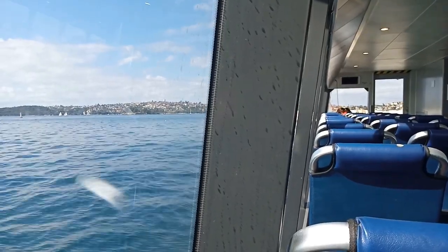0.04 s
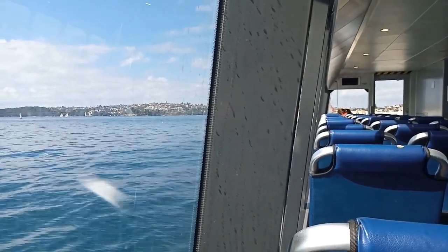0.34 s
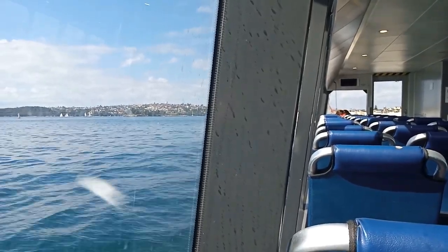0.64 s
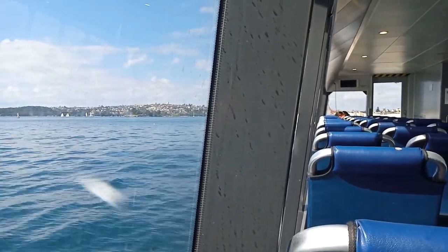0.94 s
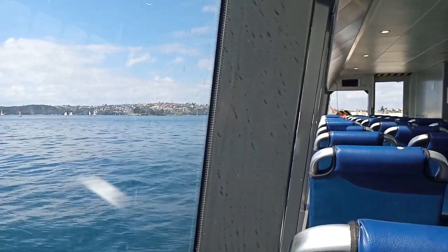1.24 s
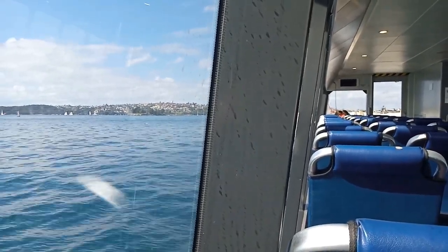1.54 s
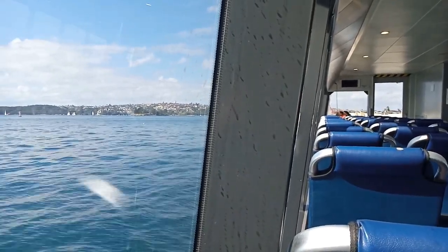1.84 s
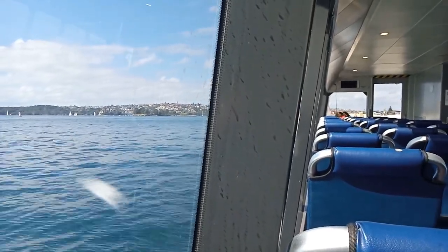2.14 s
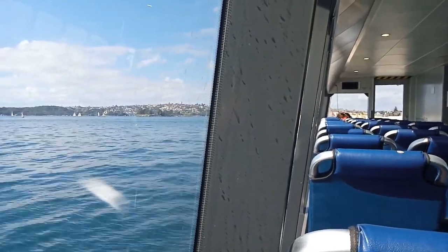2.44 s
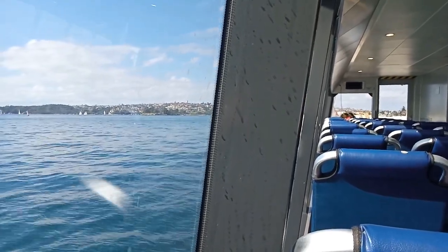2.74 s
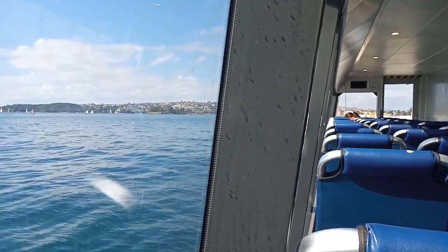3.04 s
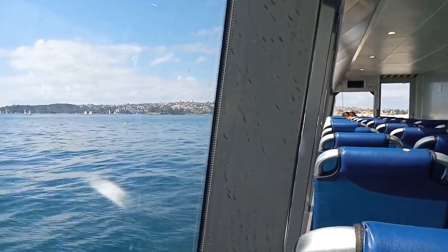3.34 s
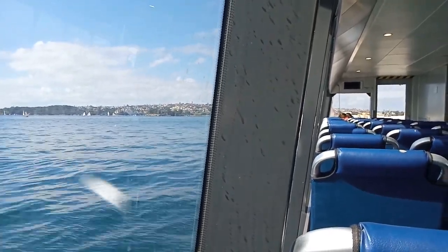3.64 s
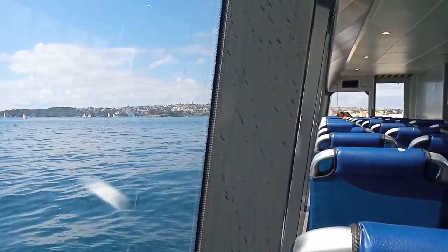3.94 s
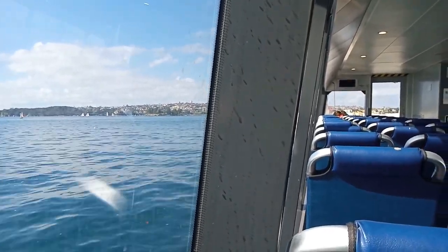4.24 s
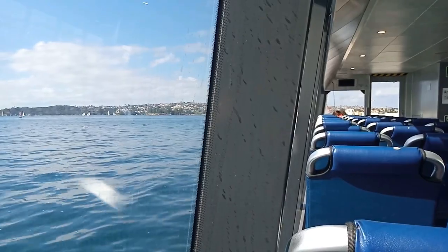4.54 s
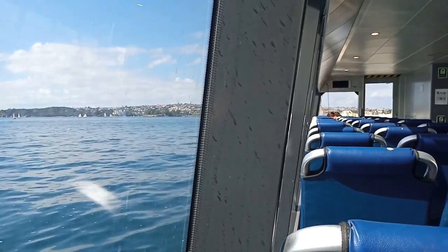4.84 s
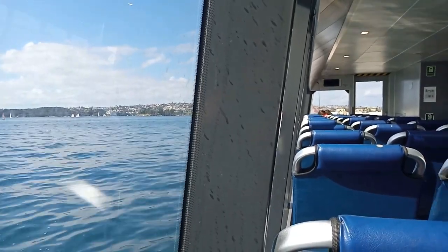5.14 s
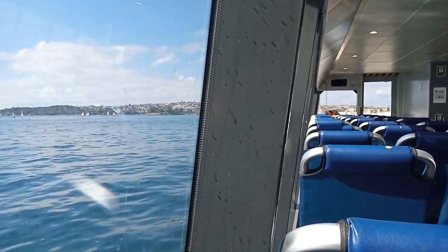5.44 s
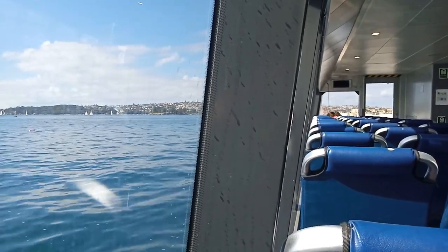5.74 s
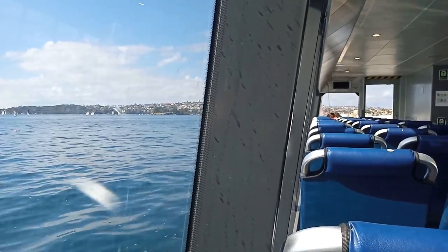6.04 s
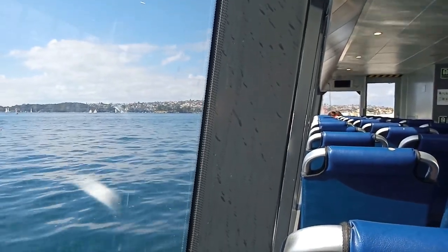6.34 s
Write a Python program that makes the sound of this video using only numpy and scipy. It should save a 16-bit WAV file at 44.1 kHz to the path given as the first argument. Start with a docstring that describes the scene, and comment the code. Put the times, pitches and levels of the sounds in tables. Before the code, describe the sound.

Inside the passenger cabin of a cruising ferry, two diesel engines make a loud, low drone with a deep throb that slowly wavers. The hull shudders and the cabin booms in small uneven surges. Behind this sit a soft rush of water and air, muffled engine clatter, a light gear whine and a very faint high whistle. The sound holds steady throughout, heard from among the seats.

```python
"""Inside the passenger cabin of a ferry at cruising speed.
Two diesel engines turn almost in step: their exhaust throbs and their tones drone and slowly beat.
The gears whine, and the turbochargers (fans that feed air to the engines) whistle faintly.
Water churned by the propellers shakes the hull and makes the cabin boom.
Behind it all are a rush of water and air and the muffled clatter of fuel firing in the cylinders."""
import sys
import numpy as np
from scipy import signal
from scipy.fft import rfft, irfft
from scipy.io import wavfile
from scipy.ndimage import uniform_filter1d

SR = 44100
rng = np.random.default_rng(int(sys.argv[2]) if len(sys.argv) > 2 else 0)


def to_wav(sig):
    """Store sig (one row per channel, or 1-D mono) as 16-bit WAV at the path in sys.argv[1].

    Samples outside -1..1 are clipped; the rate is SR.
    """
    pcm = np.clip(np.atleast_2d(sig), -1, 1) * 32767
    pcm = np.round(pcm).astype(np.int16)
    wavfile.write(sys.argv[1], SR, pcm.T)  # frames by channels


N = 282240
TIME = np.arange(N) / SR  # the second at which each sample falls
BINS = np.fft.rfftfreq(N, 1 / SR)  # the pitch in Hz of each slot in a spectrum


def gain_of(db):
    """Turns decibels (dB) into a number to multiply a sound by."""
    return 10 ** (np.asarray(db) / 20)


def curve(rows, column=1):
    """Joins a table's points with straight lines through time, giving one value a sample."""
    columns = np.transpose(rows)
    return np.interp(TIME, columns[0], columns[column])


def spectrum(points):
    """Joins points of pitch (Hz) and level (dB) into a gain for every pitch."""
    hz, db = np.transpose(points)
    return gain_of(np.interp(np.log(BINS + 1), np.log(hz + 1), db))


def noise(density):
    """Random noise with the given strength at each pitch."""
    return irfft(rfft(rng.standard_normal(N)) * density * np.sqrt(SR / 2), N)


def drift(rate, size=512):
    """A smooth random wobble of typical size 1 that changes about rate times a second."""
    hz = np.fft.rfftfreq(size, N / SR / size)
    slow = irfft(rfft(rng.standard_normal(size)) * np.exp(-.5 * (hz / rate) ** 2), size)
    slow /= np.sqrt(np.mean(slow ** 2))
    return np.interp(TIME, np.linspace(0, N / SR, size), slow)


def tone(turns):
    """A pure tone of average power 1; turns is the running count of its vibrations."""
    return np.sqrt(2) * np.sin(2 * np.pi * (turns + rng.random()))


def steadied(sound, share, size=7000):
    """Evens out a share of a noise's slow random swells and keeps its fast flutter."""
    power = uniform_filter1d(uniform_filter1d(sound ** 2, size), size // 2)
    return sound * (np.mean(sound ** 2) / (power + 1e-20)) ** (share / 2)


def rush(swell_db=.49):
    """Water along the hull and air from the vents make a steady noise that swells slightly."""
    # The body of the rush, then its faint top. Each row: pitch in Hz, noise level in dB per Hz.
    body = [(15, -71.5), (33, -65), (45, -62), (200, -55.5), (305, -56.5), (360, -56.5), (480, -60.5),
            (660, -61.5), (700, -66.5), (790, -67.5), (950, -70.5), (1140, -69.5), (1220, -72.5),
            (1540, -74)]
    hiss = [(1750, -77.5), (3300, -87), (4500, -99), (5400, -114), (6400, -110), (8300, -117), (9600, -125),
            (15500, -129)]
    return noise(spectrum(body + hiss)) * gain_of(swell_db * drift(2.7))


def wall_panels(ripple_db=1.0, spacing_hz=28):
    """A gain for every pitch: the wall panels favour many pitches a little and ring at a few."""
    # The panels that ring most. Each row: pitch in Hz, half width in Hz, boost in dB.
    panels = [(580, 20, 3), (1130, 8.1, 3), (1270, 25, 2), (2440, 50, 1), (3260, 90, 4.5), (3850, 45, 5)]
    grid = np.arange(0, SR / 2, spacing_hz)
    ripple = ripple_db * np.interp(BINS, grid, rng.standard_normal(len(grid)))
    peaks = sum(db / (1 + ((BINS - hz) / width) ** 2) for hz, width, db in panels)
    return gain_of(ripple + peaks)


def clatter(cycles, depth=.08, swell_db=1.16):
    """Firing noise comes through the walls, pulsing with the cycle, crank and unequal cylinders."""
    # The muffled noise before the panels colour it. Each row: pitch in Hz, level in dB per Hz.
    muffled = [(200, -76.5), (500, -68.5), (800, -66), (1200, -74.5), (1500, -72.5), (1750, -79),
               (2150, -84), (2600, -81.5), (3200, -86.5), (3900, -91.5), (4500, -100), (5300, -114),
               (7000, -130)]
    pulsing = sum(tone(order * cycles) for order in (1, 2, 3, 10, 11))
    through_walls = noise(spectrum(muffled) * wall_panels())
    return through_walls * (1 + depth * pulsing) * gain_of(swell_db * drift(2.2))


def turbochargers(flutter_hz=10, rasp=.38):
    """The spinning blades of each turbocharger give a thin whistle that flutters in pitch and level."""
    # The near and the far whistle. Each row: time in seconds, pitch in Hz, level in dB before the boost.
    near = [(0, 10153, -85.5), (.45, 10163, -83), (1, 10166, -85.5), (1.27, 10170, -83),
            (1.5, 10158, -85.5), (2.1, 10168, -82), (2.35, 10162, -76.5), (2.65, 10150, -76),
            (3, 10144, -81), (3.6, 10145, -83.5), (4.9, 10124, -87.5), (5.25, 10112, -82.5),
            (5.7, 10097, -80), (6.4, 10092, -78.5)]
    far = [(0, 11105, -97), (.7, 11085, -99), (1.5, 11040, -100), (2.2, 11065, -102), (2.75, 11080, -94),
           (3.1, 11055, -102), (4.1, 11070, -101), (4.3, 11100, -94), (4.5, 11120, -94), (4.7, 11150, -101),
           (5.05, 11185, -93), (5.4, 11150, -99), (5.75, 11115, -96), (6.4, 11090, -102)]
    whistles = np.zeros(N)
    for rows, boost_db, waver_db in [(near, 2.5, 1.4), (far, 1.0, 2.5)]:
        hz = curve(rows) + flutter_hz * drift(25)
        whistle = tone(np.cumsum(hz) / SR)
        level = gain_of(curve(rows, column=2) + boost_db + waver_db * drift(13))
        roughness = 1 + rasp * drift(70, size=4096)
        whistles += level * roughness * whistle
    return whistles


def cabin_boom():
    """Churned water rings the cabin and hull; all but the lowest note surge with the propeller wash."""
    # The notes they ring at. Each row: pitch in Hz, width in Hz, level in dB per Hz before the surges.
    notes = [(32.8, 3.6, -54.5), (76.2, 11, -40.5), (74.2, 12, -39), (88.6, 7.4, -51.5), (108.5, 9.1, -47),
             (136.8, 9.9, -37), (147.7, 7.8, -37.5), (165, 8.7, -45), (181.5, 24, -41), (190, 32, -46.5),
             (223, 18, -40.5), (244.8, 12, -41.5), (272.8, 22, -45)]
    # The four pitches in Hz that split those notes into five groups.
    edges_hz = [60, 120, 160, 205]
    # The surges of the top four groups, low to high. Each row: time in seconds, level change in dB.
    deep = [(0.0, -1), (0.16, 2.5), (0.3, -6), (0.46, 0.5), (1.62, -4), (2.16, -15.5), (2.3, -6),
            (2.76, -6.5), (3.24, 4.5), (3.58, 1), (3.94, 0), (4.24, 7), (4.36, -4), (4.58, -0.5),
            (4.74, -7), (4.88, 4.5), (5.26, 5.5), (5.46, -5.0), (5.92, 9), (6.08, -2), (6.18, 7),
            (6.38, -3)]
    low = [(0.0, -3), (0.24, -6.5), (0.34, -2), (0.44, -2), (0.62, 1), (0.9, 1), (1.18, -13.5), (1.3, -2.0),
           (1.72, 1.5), (1.8, 3.5), (2.06, 2.5), (2.36, 0.5), (2.58, -9.5), (2.68, 1.0), (2.74, -2.5),
           (2.86, 8), (2.98, -0.5), (3.12, 2), (3.24, -1.5), (3.48, 2.5), (3.58, 4.5), (3.7, 6),
           (3.94, -4.0), (4.0, 2.5), (4.2, 5.5), (4.3, -9.5), (4.52, 1), (4.62, -8.5), (4.9, 6), (5.0, -4),
           (5.1, -1), (5.56, -2.5), (5.7, 4.5), (5.78, -5), (6.12, -6.5), (6.18, 5), (6.32, 2.5), (6.38, 3)]
    middle = [(0.0, 0), (0.44, -2.0), (0.96, -1.5), (1.66, -1.5), (1.84, 2), (2.4, -4.5), (2.5, 6.5),
              (2.64, 3), (2.7, -5.5), (2.8, 1.5), (3.16, -2), (3.26, 1), (3.36, -4.5), (3.72, 5),
              (3.82, -9), (4.0, 5), (4.12, -3), (4.34, 5), (4.42, -1.0), (4.58, 0), (4.66, -2), (5.02, 0),
              (5.12, -1.5), (5.32, 4), (5.38, -1.0), (5.84, 0.5), (5.92, 2.5), (6.04, -2.5), (6.28, -3.5),
              (6.38, -0.5)]
    upper = [(0.0, -6.5), (0.24, 4), (0.62, -2.5), (1.44, 0.5), (1.54, 3), (1.64, -2), (1.86, 4), (2.0, -4),
             (2.68, -3), (2.8, 3), (3.34, 1.5), (3.44, 5.5), (3.54, -3), (3.76, 4.5), (4.16, -6.5),
             (4.54, 0.5), (4.64, -3.5), (4.9, 3), (5.04, -1), (5.22, 3.5), (5.32, -5), (5.46, 5),
             (5.66, -1.5), (6.14, -5), (6.24, 1.5), (6.38, -8)]
    surges_db = [0, curve(deep), curve(low), curve(middle), curve(upper)]
    groups = np.zeros((len(surges_db), N))
    for hz, width, db in notes:
        peak = gain_of(db) / (1 + ((BINS - hz) / width) ** 2) ** 2
        groups[np.searchsorted(edges_hz, hz)] += noise(peak)
    return sum(gain_of(db) * steadied(ring, share=.8) for db, ring in zip(surges_db, groups))


def propeller_shudder(cycles, order=4.94, jitter_turns=.09):
    """Each passing propeller blade pushes on the hull, unsteadily in the churned water."""
    # The strength of the shudder. Each row: time in seconds, level in dB.
    shudder = [(0.0, -31), (0.16, -30.5), (0.86, -37.5), (1.02, -29), (1.32, -23), (1.4, -39), (1.66, -35),
               (1.78, -30.5), (2.12, -23.0), (2.58, -21), (2.76, -26), (2.9, -21), (3.7, -38.5),
               (3.82, -28.5), (4.12, -20), (4.28, -26), (4.78, -21.5), (5.0, -25.5), (5.12, -19),
               (5.54, -28.5), (5.88, -28.5), (6.38, -24)]
    return gain_of(curve(shudder)) * tone(order * cycles + jitter_turns * drift(4))


def gear_whine(cycles, mesh_order=56.4, singing_order=108, pump_order=86.65, jitter_turns=.03):
    """Meeting gear teeth whine at a note and its octave; a pump and an engine tone sing in between."""
    # The whine, its octave and the high engine tone. Each row: time in seconds, relative level in dB.
    mesh_levels = [(0.0, -45), (0.12, -41), (0.76, -41), (1.16, -49.5), (1.64, -43.5), (1.98, -49),
                   (2.32, -38.5), (3.02, -40.5), (3.3, -42.5), (3.86, -44.5), (4.38, -49.5), (4.56, -39.5),
                   (4.74, -36.5), (4.96, -42), (5.76, -41), (5.94, -51.5), (6.24, -39.5), (6.38, -45)]
    octave_levels = [(0.0, -49.5), (0.22, -49.5), (0.9, -53), (1.06, -44.5), (1.36, -51.5), (1.64, -44.5),
                     (2.06, -57.5), (2.6, -51.5), (2.68, -62), (2.9, -54.5), (4.22, -49.5), (4.36, -56.5),
                     (4.52, -50.5), (5.22, -54), (5.76, -49), (6.38, -60)]
    singing_levels = [(0.0, -49), (0.42, -50), (1.08, -47.0), (1.26, -54.5), (1.86, -46.5), (2.12, -54.5),
                      (2.4, -49), (3.82, -53.5), (4.0, -45.5), (4.56, -49), (4.96, -62), (5.06, -54),
                      (5.24, -60.5), (5.38, -47.5), (6.18, -46), (6.38, -46.5)]
    # A slightly off-centre shaft adds side tones around the whine and around its octave.
    # Each entry: distance from the centre tone in orders, level in dB compared with that tone.
    mesh_sides = {-2: -14, 0: 0, 2: -7, 4: -16}
    octave_sides = {-2: -3.5, 0: 0, 2: -12}

    def cluster(centre, sides, waver_rate):
        """A centre tone and its side tones, each wavering a little in level."""
        return sum(gain_of(db) * (1 + .08 * drift(waver_rate)) * tone(centre + distance * cycles)
                   for distance, db in sides.items())

    teeth = mesh_order * cycles + jitter_turns * drift(3)
    mesh = cluster(teeth, mesh_sides, waver_rate=3) * gain_of(curve(mesh_levels) + .16)
    octave = cluster(2 * teeth, octave_sides, waver_rate=2.8) * gain_of(curve(octave_levels) + .4)
    singing = tone(singing_order * cycles + jitter_turns * drift(3)) * gain_of(curve(singing_levels))
    pump = tone(pump_order * cycles + jitter_turns * drift(3)) * gain_of(-56)
    return mesh + octave + singing + pump


def engine_overtones(cycles, jitter_turns=.051):
    """Three engine tones stand out of the drone: two come and go, one holds steady."""
    # A middle and a thin high overtone of the firing. Each row: time in seconds, relative level in dB.
    middle = [(0.0, -51), (0.7, -42), (1.181, -45.5), (1.58, -36), (2.0, -51), (2.2, -38.5), (2.9, -52.5),
              (3.44, -51), (3.76, -39), (3.9, -51.5), (4.3, -37), (4.719, -49.5), (5.38, -45.5),
              (6.38, -52.5)]
    high = [(0.0, -63.5), (0.72, -45.5), (1.58, -56.5), (1.801, -52.5), (2.76, -53), (2.98, -55.5),
            (3.44, -47), (3.68, -54.5), (4.46, -48), (5.44, -57.5), (5.82, -48.5), (6.38, -46)]
    db_by_order = {36: curve(middle), 84: curve(high) - 2, 39: -44.5}
    return sum(gain_of(db) * tone(order * cycles + jitter_turns * drift(4))
               for order, db in db_by_order.items())


def engine_drone(near_cycles, far_cycles, far_db=-13, uneven=.31, jitter_turns=.064):
    """The two engines' tones slip in and out of step and beat; uneven burning makes them waver."""
    # The tones of the drone. Each entry: order, the near engine's typical level in dB.
    orders = {3: -57, 4: -49, 7: -36, 8: -32, 10: -31, 11: -38, 18: -37, 20: -39.5, 21: -42.5, 24: -44.5,
              27: -52, 30: -44.5, 31: -47.5, 33: -52, 34: -46, 37: -46, 40: -55.5, 41: -50.5, 43: -54.5, 44:
              -56, 48: -55.5, 53: -54, 54: -52.5, 57: -57, 58: -51, 60: -50.5, 63: -60.5, 64: -57.5, 66:
              -60, 75: -59.5, 100: -56, 115: -62.5, 122: -67, 123: -64.5, 124: -65.5, 129: -75, 138: -64.5,
              153: -62.5, 181: -67.5, 195: -67.5, 215: -74}
    drone = np.zeros(N)
    for order, db in orders.items():
        near = tone(order * near_cycles + jitter_turns * drift(2.5))
        far = gain_of(far_db) * tone(order * far_cycles)
        waver = 1 + uneven * drift(2.5)
        drone += gain_of(db) * waver * (near + far)
    return drone


def exhaust_throb(cycles, flutter_db=.5, jitter_turns=.027):
    """Six exhaust pulses a cycle make a deep note and its octave; unequal cylinders add a hum between."""
    # The deep note, its octave and the hum. Each row: time in seconds, relative level in dB.
    firing = [(0.0, -19.5), (0.14, -27.0), (0.6, -18.5), (1.0, -24), (1.38, -18.5), (2.14, -40),
              (2.36, -25), (2.64, -20.5), (3.3, -23.0), (3.54, -31.5), (3.7, -22), (3.9, -15),
              (4.06, -25.5), (4.24, -20.5), (4.36, -26.5), (4.74, -19.5), (4.92, -28.5), (5.32, -23),
              (5.44, -29), (5.82, -20.5), (6.24, -29), (6.38, -16)]
    octave = [(0.0, -25.5), (0.24, -35.5), (0.38, -20), (0.7, -37), (0.88, -19.5), (1.06, -21.5),
              (1.28, -26.5), (1.44, -23), (1.58, -29), (1.74, -30), (1.88, -31.5), (2.26, -19.5),
              (2.36, -33.5), (2.5, -20.5), (2.64, -27.5), (2.9, -22), (3.3, -31), (3.36, -33), (3.56, -25),
              (3.86, -28.5), (3.96, -25), (4.18, -23.5), (4.48, -29.5), (4.66, -24), (4.84, -24),
              (4.92, -37), (5.2, -27), (5.28, -30), (5.54, -31), (5.74, -28.5), (5.96, -24.0),
              (6.38, -35.5)]
    hum = [(0.0, -19), (0.56, -28), (0.76, -23.5), (1.26, -36), (1.38, -24.5), (1.58, -21.5), (1.74, -32),
           (2.16, -21), (2.56, -28), (2.78, -27.0), (3.56, -27.5), (3.72, -25.0), (4.28, -32), (4.66, -23),
           (4.86, -30.5), (5.06, -23.5), (5.5, -28.5), (5.74, -23.0), (6.24, -32), (6.38, -34)]
    db_by_order = {6: curve(firing), 12: curve(octave) + .27, 9: curve(hum) - 1}
    throb = np.zeros(N)
    for order, db in db_by_order.items():
        level = gain_of(db + flutter_db * drift(3))
        throb += level * tone(order * cycles + jitter_turns * drift(12))
    return throb


def scene():
    """Both engines and all they drive. A tone's "order" is how often it vibrates in one engine cycle."""
    # The near engine's speed. Each row: time in seconds, crank turns a minute.
    speed = [(0, 1638), (.15, 1641), (.7, 1636), (1.4, 1629), (1.8, 1633), (2.1, 1632), (2.4, 1635),
             (3.3, 1632), (4.15, 1631), (4.7, 1638), (5.2, 1635), (5.6, 1635.5), (6.4, 1632)]
    cycle_hz = curve(speed) / 60 / 2  # one cycle takes two crank turns
    near = np.cumsum(cycle_hz) / SR  # running count of cycles
    far = np.cumsum(cycle_hz * (1.002 + .001 * drift(.5))) / SR  # the far engine runs slightly faster
    engines = exhaust_throb(near) + engine_overtones(near) + engine_drone(near, far)
    machinery = gear_whine(near) + clatter(near) + turbochargers()
    water = propeller_shudder(near) + cabin_boom() + rush()
    return (engines + machinery + water)[None]


def record(dry):
    """Fades both ends so they do not click, then cuts the treble above 15500 Hz."""
    eased = dry * signal.windows.tukey(N, .001)
    low_pass = signal.firwin(511, 15500, window=("kaiser", 9), fs=SR)
    return signal.oaconvolve(eased, low_pass[None], "same")


dry = scene()
out = record(dry)
to_wav(out)
```